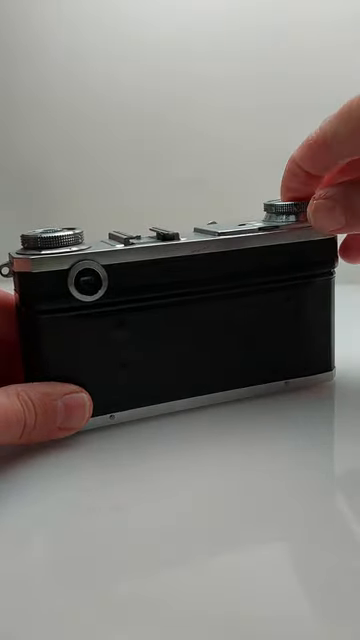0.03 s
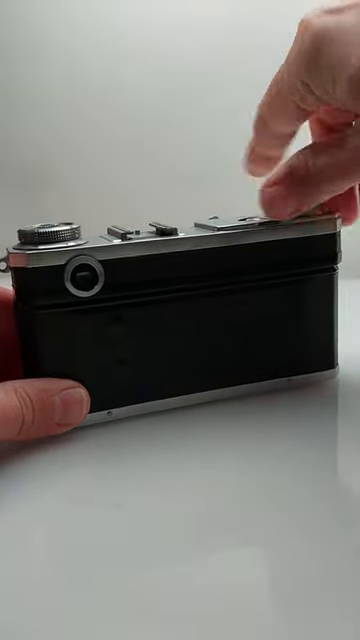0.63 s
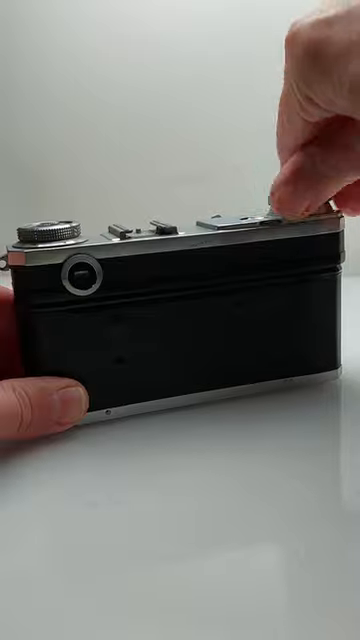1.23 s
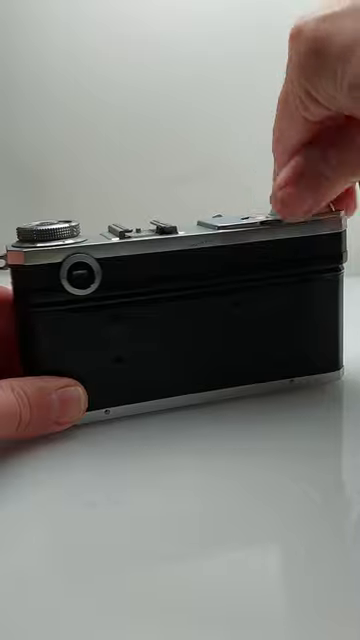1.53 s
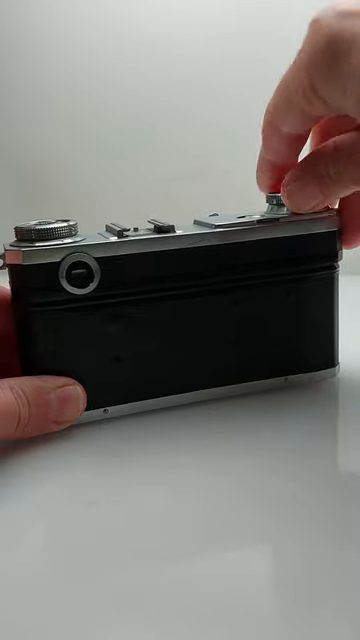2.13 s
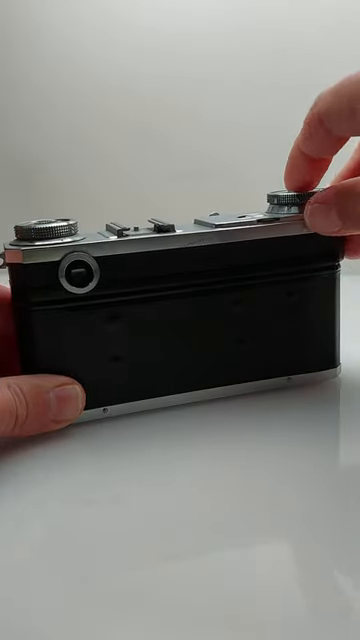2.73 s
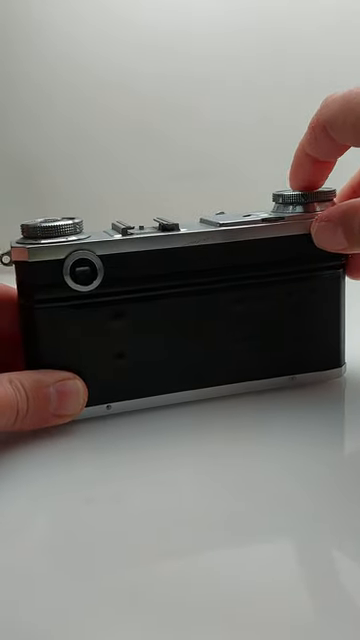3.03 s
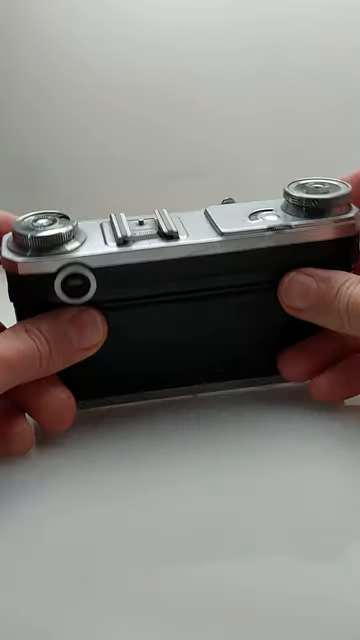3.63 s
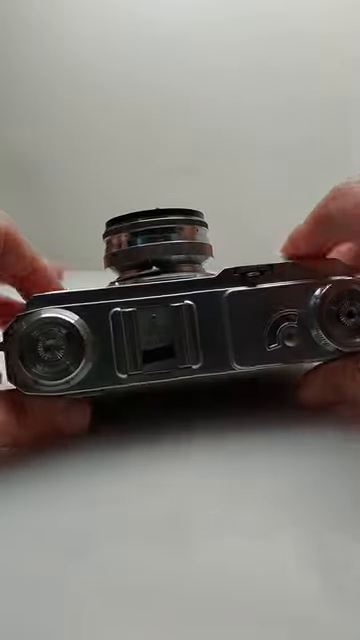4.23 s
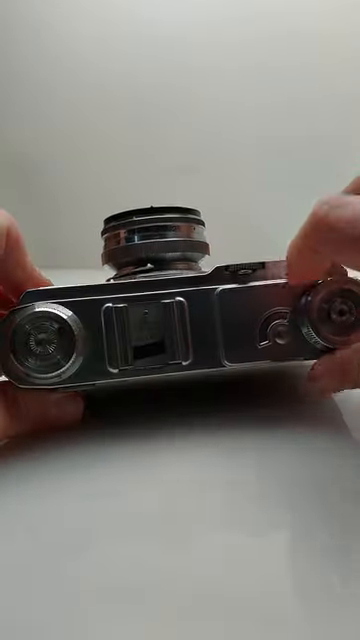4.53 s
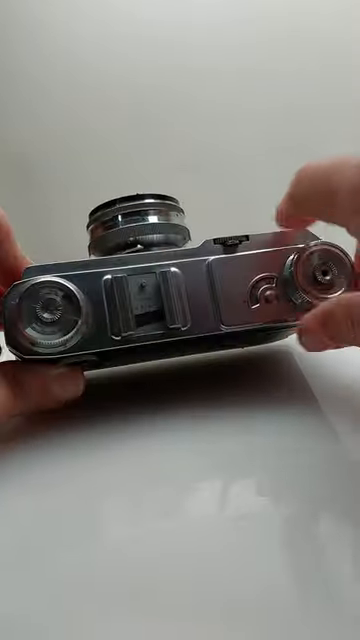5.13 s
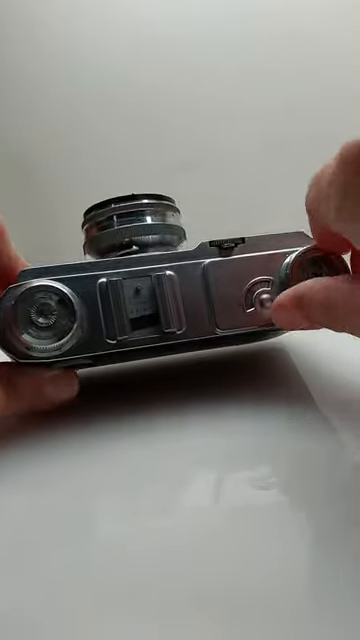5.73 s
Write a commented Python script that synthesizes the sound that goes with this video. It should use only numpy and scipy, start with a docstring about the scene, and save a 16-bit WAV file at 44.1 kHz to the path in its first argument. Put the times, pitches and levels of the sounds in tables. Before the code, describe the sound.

Close to the microphone in a small, quiet room, a mechanical camera on a table gives one crisp shutter snap with a low thud. Lighter metallic clicks and tiny pings follow as a dial is set by hand. A second snap comes about three seconds in, then a few dull bumps as the camera tips over. Faint finger rubbing, very faint wavering whistles and some clicks from the winding knob finish it.

```python
"""An old metal rangefinder camera is handled on a table in a small room, close to a phone.
The cloth shutter fires: its curtains whirr across and slam into their brakes, thumping case and table.
The speed dial is lifted, turned and dropped, with clicks, scrapes and a thin ping from its spring.
The shutter fires again, then the camera is tipped over, bumping and dragging on the table.
Last, fingers rub over leather and chrome and work the winding knob, with thin, wavering whistles."""
import sys
import numpy as np
from scipy import signal
from scipy.fft import rfft, irfft
from scipy.io import wavfile
from scipy.ndimage import uniform_filter1d

SR = 44100
rng = np.random.default_rng(int(sys.argv[2]) if len(sys.argv) > 2 else 0)


def bounce(signal):
    """Save signal as a 16-bit WAV file at the path given by the first command-line argument."""
    frames = np.transpose(np.atleast_2d(signal))
    limited = np.clip(frames, -1, 1)
    pcm = np.round(limited * 32767).astype(np.int16)
    wavfile.write(sys.argv[1], SR, pcm)


N = 264159
TIME = np.arange(N) / SR
RING_T = np.arange(int(.35 * SR)) / SR

# the shutter fires: start_s, gain_db
SHOTS = [(0.0141, 0.5), (3.2021, 0)]
# each firing trips the release, then brakes the two curtains in turn: delay_s, level_db, hardness_db
SHUTTER_STOPS = [(-.0302, -47, 10), (0, -26.5, 3), (.0089, -26.5, 0)]
# dial and knob drop into their stops: start_s, level_db, hardness_db, thump_db
DIAL_STOPS = [(0.169, -54, -5.5, -48), (0.2129, -57, -8.5, -56), (0.3047, -47.5, -1, -47.5),
              (0.5694, -54, 3, -54), (0.9128, -36.5, 2, -34.5), (0.974, -63.5, -12.5, -46.5),
              (1.0359, -50.5, -2.5, -41), (1.3346, -50.5, -1, -50), (1.4035, -48, -2.5, -54),
              (1.4209, -44, -1.5, -35), (1.5956, -40.5, 2, -57), (1.6057, -35.5, -0.5, -31),
              (1.633, -43, 0, -48), (1.7317, -49.5, -1.5, -41.5), (1.852, -42.5, 3, -50),
              (1.9653, -56, -2.5, -52), (1.992, -44.5, -0.5, -41.5), (2.012, -60, -6, -47.5),
              (3.347, -55.5, -2, -51), (3.879, -67.5, -6.5, -56), (4.3531, -69.5, 3.5, -63),
              (4.5775, -68, 1.5, -67), (5.1, -68, -1.5, -68), (5.1378, -57, -4.5, -57),
              (5.2328, -59, -9, -49.5), (5.5326, -68.5, -10.5, -55.5), (5.716, -35.5, -2.5, -47.5),
              (5.748, -52.5, 5, -49.5), (5.8634, -63.5, -4, -62.5), (5.921, -50.5, 0, -52.5)]
# the body bumps on the table as it tips over: start_s, level_db, thump_db, thump_hz
BUMPS = [(3.7663, -58.5, -30, 138.7), (3.7778, -48.5, -27.5, 150.6), (3.959, -38, -29.5, 96),
         (4.0224, -50.5, -31.5, 144), (4.227, -60.5, -39, 146)]
# midrange colour of the small metal parts: frequency_hz, gain_db
METAL_COLOUR = [(600, -24), (1300, 4.5), (1850, 4), (2500, 2), (3500, -5), (4800, 1), (6800, -15),
                (9000, -28)]
# their treble colour: frequency_hz, gain_db
TREBLE_COLOUR = [(4000, -51), (5800, -1.5), (6800, -0.5), (8200, -1), (10000, 4.5), (11800, 1.5),
                 (13500, -0.5), (16000, -7)]


def undb(db):
    return 10 ** (np.asarray(db) / 20)


def level(x, db, span_s=None):
    """Scale x so that its first span_s seconds (or all of it) have this rms level."""
    head = x if span_s is None else x[..., :int(span_s * SR)]
    return x * undb(db) / np.sqrt(np.mean(head ** 2) + 1e-20)


def add(track, s, x):
    """Mix x into the track from time s on."""
    i = int(s * SR)
    x, i = x[..., max(-i, 0):], max(i, 0)
    track[..., i:i + x.shape[-1]] += x[..., :max(N - i, 0)]


def fade(t60):
    return np.exp(-np.log(1000) * RING_T / t60)


def mode(hz, t60):
    return np.sin(2 * np.pi * hz * RING_T) * fade(t60)


def through(x, response):
    return signal.oaconvolve(x, response)[:len(x)]


def colour(points, size=2048):
    """Causal impulse response with the given (Hz, dB) spectrum."""
    hz, db = np.transpose(points)
    bin_hz = np.arange(size // 2 + 1) * SR / size
    gain = undb(np.interp(np.log(bin_hz + 1), np.log(hz), db))
    cepstrum = irfft(np.log(gain))
    cepstrum[1:size // 2] *= 2
    cepstrum[size // 2 + 1:] = 0
    return irfft(np.exp(rfft(cepstrum)))[:size]


def varied_colour(points, spread_db=4.5):
    """Each contact excites the metal a little differently."""
    return colour(np.array(points) + np.outer(rng.standard_normal(len(points)), [0, spread_db]))


def wander(rate_hz):
    """A smooth random drift around zero."""
    hold = max(int(SR / rate_hz), 1)
    steps = np.repeat(rng.standard_normal(N // hold + 1), hold)
    return 1.8 * uniform_filter1d(steps, hold)[:N]


def grit(n, spread_db, size=12):
    """Dense tiny contacts of uneven strength, capped so that none stands out."""
    strength = undb(spread_db * np.minimum(rng.exponential(1, n // size + 1), 4))
    return rng.standard_normal(n) * np.repeat(strength, size)[:n]


def contact(db, hardness_db):
    """Hardness trades case ring for metal and treble; returns case_db, metal_db, treble_db."""
    return db - hardness_db + 2, db + .15 * hardness_db, db + hardness_db - 2.5


def case_ring(centre_hz, focus_db=15, decay_scale=.46):
    """Each part strikes the case elsewhere and favours the modes around its own centre."""
    # modes of the camera case: pitch_hz, level_db, t60_s (before decay_scale)
    case_modes = [(525, -2, 0.11), (576, -5.5, 0.12), (640, -2, 0.02), (718, -7.5, 0.18),
                  (799, -2.5, 0.087), (802, -8.5, 0.033), (954, -5, 0.054), (1096, -2, 0.077),
                  (1204, -4, 0.097), (1373, 1, .07)]
    signs = rng.choice([-1, 1], len(case_modes))
    return sum(sign * undb(db - focus_db * abs(np.log2(hz / centre_hz))) * mode(hz, t60 * decay_scale)
               for sign, (hz, db, t60) in zip(signs, case_modes))


def scrape_cues(curtain_lead_s=.022, curtain_swell_db=11, run_up_s=.02, run_up_swell_db=7.5):
    """Parts speed up into their stops, long turns stay even: start_s, end_s, contact levels, swell_db."""
    # longer turns of dial and knob: start_s, end_s, level_db, hardness_db
    long_turns = [(0.518, 0.567, -68, 0), (1.235, 1.338, -64.5, -0.5), (1.61, 1.639, -52.5, -1.5),
                  (1.962, 2.027, -56.5, -3.5), (2.189, 2.3, -78.5, -2), (3.774, 3.851, -64.5, -3),
                  (4.719, 5.16, -79.5, -7), (5.528, 5.564, -66.5, -4)]
    last_brake_s = SHUTTER_STOPS[-1][0]
    curtains = [(s - curtain_lead_s, s + last_brake_s, contact(db - 38.5, -3.5), curtain_swell_db)
                for s, db in SHOTS]
    run_ups = [(s - run_up_s, s, contact(db - 20, hard), run_up_swell_db)
               for s, db, hard, _ in DIAL_STOPS]
    turns = [(start, end, contact(db, hard), 0) for start, end, db, hard in long_turns]
    return curtains + run_ups + turns


def scrapes(case_hz=900, trim_db=1.5, catch_db=3):
    """Curtain gears and dial teeth catch and slip as they slide; returns case, metal and treble."""
    out = np.zeros((3, N))
    metal, treble = colour(METAL_COLOUR), colour(TREBLE_COLOUR)
    for start, end, levels, swell_db in scrape_cues():
        n = max(int((end - start) * SR), 100)
        force_db = swell_db * np.arange(n) / n + catch_db * wander(300)[:n]
        force = undb(force_db) * signal.windows.tukey(n, .3)
        friction = np.pad(grit(n, spread_db=.5, size=24) * force, (0, len(RING_T)))
        case = case_ring(case_hz, focus_db=16.5, decay_scale=.26)
        for track, response, db in zip(out, (case, metal, treble), levels):
            add(track, start, level(through(friction, response), db + trim_db, n / SR))
    return out


def click_cues(brake_hz=724, bump_hz=584, dial_hz=935, octaves_per_db=.05):
    """Shutter stops, soft bumps and small clicks: start_s, contact levels, ring_hz."""
    # ticks of a nail or a loose part, too light to move the camera: start_s, level_db
    ticks = [(0.5273, -68.5), (0.679, -61.5), (0.767, -68), (0.854, -58), (1.0224, -62), (1.229, -62),
             (1.749, -58.5), (1.7875, -60), (2.145, -66.5), (2.523, -68), (3.659, -56), (3.749, -64.5),
             (4.96, -70), (5.355, -64), (5.4157, -70.5)]
    shutter = [(s + delay, contact(db + shot_db, hard), brake_hz)
               for s, shot_db in SHOTS for delay, db, hard in SHUTTER_STOPS]
    bumps = [(s, contact(db, hardness_db=-11.5), bump_hz) for s, db, _, _ in BUMPS]
    # among the small clicks, harder ones ring higher; ticks are hardest
    hits = [row[:3] for row in DIAL_STOPS] + [(s, db, 9.5) for s, db in ticks]
    small = [(s, contact(db, hard), dial_hz * 2 ** (octaves_per_db * hard)) for s, db, hard in hits]
    return shutter + bumps + small


def clicks(thud_t60=.0097, chatter_t60=.025, seat_s=.0009, span_s=.007):
    """A part meets its stop and chatters for a few milliseconds; returns case, metal and treble."""
    out = np.zeros((3, N))
    seating = 1 - np.exp(-RING_T / seat_s)
    for s, (case_db, metal_db, treble_db), hz in click_cues():
        chatter = grit(len(RING_T), spread_db=2.5) * seating * fade(chatter_t60)
        # the gripping hand kills most of the case's first swing at once
        ring = level(case_ring(hz), 0, span_s) + level(mode(hz, thud_t60), 0, span_s)
        add(out[0], s, level(ring * seating, case_db - 1, span_s))
        add(out[1], s, level(through(chatter, varied_colour(METAL_COLOUR)), metal_db, span_s))
        add(out[2], s, level(through(chatter, varied_colour(TREBLE_COLOUR)), treble_db, span_s))
    return out


def thump_cues(flex_hz=332.5, dial_hz=145.8, nudge_hz=95, tipped_s=4.5, tipped_ratio=1.54):
    """Blows into the table, soft fingers low and hard stops high: start_s, level_db, pitch_hz."""
    # release and brakes each jolt the table: delay_s, level_db, pitch_hz
    jolts = [(-.024, -30, 150), (.0005, -24, 165), (0.011, -17, 175.6)]
    # fingertips press or let go and rock the camera: start_s, level_db
    nudges = [(0.258, -49), (0.433, -51.5), (0.689, -53), (0.791, -44), (1.113, -48), (2.199, -51.5),
              (3.071, -46.5), (3.542, -50), (3.66, -42.5), (4.389, -49.5), (5.197, -53), (5.634, -49)]
    cues = [(s + delay, db + shot_db, hz) for s, shot_db in SHOTS for delay, db, hz in jolts]
    # the second brake and each bump also flex the body: a hollow note
    cues += [(s + jolts[-1][0], shot_db - 29, flex_hz) for s, shot_db in SHOTS]
    cues += [(s, thump_db, hz) for s, _, thump_db, hz in BUMPS]
    cues += [(s + .0071, db + 8.5, flex_hz) for s, db, _, _ in BUMPS]
    cues += [(s, thump_db, dial_hz) for s, _, _, thump_db in DIAL_STOPS]
    cues += [(s, db, nudge_hz) for s, db in nudges]
    # on its front edge the camera sits more stiffly and swings higher
    return [(s, db, hz * (tipped_ratio if s > tipped_s else 1)) for s, db, hz in cues]


def table_thumps(swing_t60=.051, ring_db=-3, focus_db=9, scatter_db=4.5, decay_scale=.82, span_s=.02):
    """The held camera swings briefly on the table, whose modes near that pitch ring on in stereo."""
    # modes of the loaded table: pitch_hz, level_db, t60_s (before decay_scale), left_minus_right_db
    table_modes = [(67, 5, 0.32, -11), (113, -0.5, 0.15, 10), (134.86, 1.5, 0.26, 9),
                   (174.5, -2.5, 0.24, -2), (198.5, -5.5, 0.26, 5.5), (279.3, -5, 0.19, -8.5),
                   (328.5, 5, 0.14, -2.5), (349.3, -3, 0.059, -2.5)]
    out = np.zeros((2, N))
    hz, mode_db, t60, pan_db = np.transpose(table_modes)
    rings = np.array([mode(f, t * decay_scale) for f, t in zip(hz, t60)])
    sides = undb(np.outer([1, -1], pan_db) / 2)
    for s, db, swing_hz in thump_cues():
        rise = 1 - np.exp(-(RING_T * swing_hz) ** 2)  # the contact builds over one cycle
        scatter = scatter_db * rng.standard_normal(len(hz))
        weights = undb(mode_db - focus_db * abs(np.log2(hz / swing_hz)) + scatter)
        swing = level(mode(swing_hz, swing_t60) * rise, 0, span_s)
        ring = level((sides * weights) @ rings * rise, ring_db, span_s)
        add(out, s, level(swing + ring, db - 1, span_s))
    return out


def dial_spring():
    """The dial's spring rings on, thin and high, after some clicks."""
    # the spring is set ringing: start_s, level_db
    pings = [(.765, -57), (1.747, -47), (1.788, -55), (1.852, -42)]
    # its modes: pitch_hz, level_db, t60_s
    spring_modes = [(6700, -17, .1), (10400, -15, .1), (11450, -6, 0.11), (11700, -3, 0.081),
                    (13210, -16, .1)]
    out = np.zeros(N)
    ring = sum(undb(db) * mode(hz, t60) for hz, db, t60 in spring_modes)
    for s, db in pings:
        add(out, s, undb(db) * ring)
    return out


def finger_rubs(trim_db=1):
    """Skin drags unevenly over the camera; returns a dull rub on leather and a hiss on chrome."""
    # fingers shift their grip: start_s, end_s, leather_db, chrome_db
    strokes = [(2.172, 2.35, -74, -79), (2.423, 2.568, -80, -94), (3.461, 3.525, -76, -66.5),
               (3.613, 3.812, -71.5, -72), (4.082, 4.261, -68.5, -69.5), (4.26, 4.684, -78, -74.5),
               (4.669, 5.19, -72, -72), (5.314, 5.737, -68.5, -78.5)]
    # colour of rubbed leather: frequency_hz, gain_db
    leather = [(200, -5), (500, -7.5), (820, -0.5), (1250, -6.5), (1800, -7), (2300, -13), (3200, -29),
               (7000, -23.5), (16000, -53)]
    # colour of rubbed chrome: frequency_hz, gain_db
    chrome = [(1000, 4), (3000, -12), (4500, -4.5), (6500, -5), (8200, -9), (10500, 1), (13000, -10.5),
              (16000, -3)]
    speed = np.zeros((2, N))
    for start, end, *levels in strokes:
        flat_arch = np.hanning(max(int((end - start) * SR), 8)) ** .067
        add(speed, start, np.outer(undb(levels), flat_arch))
    rub_gain, hiss_gain = speed * undb(2 * wander(35))
    rub = level(through(grit(N, spread_db=3.5), colour(leather)), trim_db)
    hiss = level(through(grit(N, spread_db=-4), colour(chrome)), trim_db)
    return rub_gain * rub, hiss_gain * hiss


def drag_and_whistles(flutter_db=1):
    """The camera drags on the table, a faint, rough scrape near 2.2 kHz; then thin, wavering whistles."""
    # narrow tones, rougher with more jitter: start_s, end_s, start_hz, end_hz, jitter_hz, level_db
    tones = [(4.04, 4.45, 2200, 2150, 230, -77), (5.17, 5.62, 4480, 4430, 50, -81),
             (5.55, 5.7, 4550, 4100, 50, -79)]
    out = np.zeros(N)
    for start, end, start_hz, end_hz, jitter_hz, db in tones:
        n = max(int((end - start) * SR), 100)
        hz = np.linspace(start_hz, end_hz, n) + jitter_hz * wander(630)[:n]
        envelope = signal.windows.tukey(n, .3) * undb(flutter_db * wander(42)[:n])
        add(out, start, level(envelope * np.sin(2 * np.pi * np.cumsum(hz) / SR), db))
    return out


def mic_ports(x, pan_db, lag_s):
    """The phone's left port hears x as it is; the right one lag_s later and pan_db lower."""
    return np.array([x, undb(-pan_db) * np.interp(TIME - lag_s, TIME, x)])


def wall_echo(low_t60=.27, high_t60=.22, first_s=.001, build_s=.001, size=256):
    """Diffuse reflections of near walls: an even spectrum whose treble fades a little sooner."""
    # colour of the room's echo: frequency_hz, gain_db
    room_colour = [(80, -24), (300, -16), (600, -7), (1500, -6), (4500, -7.5), (8000, -6), (16000, -6)]
    f, t, spectra = signal.stft(rng.standard_normal(len(RING_T)), SR, nperseg=size)
    hz, db = np.transpose(room_colour)
    db = np.interp(np.log(f + 1), np.log(hz), db)[:, None]
    decay = np.log(1000) / np.interp(f, [500, 4000], [low_t60, high_t60])[:, None]
    gain = undb(db) * np.exp(-decay * t) * np.sqrt(2 * decay / SR)  # same energy whatever the decay
    even = spectra / (abs(spectra) + 1e-12) * np.std(spectra)
    tail = signal.istft(even * gain, SR, nperseg=size)[1][:len(RING_T)]
    return tail * (1 - np.exp(-np.maximum(RING_T - first_s, 0) / build_s))


def room(x, count=6):
    """Each port hears its own reflections, and they shift as hands and camera move."""
    place = np.linspace(0, count - 1, N)
    crossfades = [np.sqrt(np.maximum(1 - abs(place - k), 0)) for k in range(count)]
    return np.array([sum(through(x * share, wall_echo()) for share in crossfades) for _ in range(2)])


def room_tone(shared_hz=300, level_db=-68.5):
    """Faint rumble common to both ports, under their own hiss."""
    # spectrum of the still room: frequency_hz, density_db
    still_air = [(15, -50), (25, -7.5), (58, -1), (145, 1.5), (242, -5), (293, -5), (384, -14.5),
                 (439, -15.5), (489, -25), (641, -19), (5730, -33.5), (9570, -33), (16000, -33)]
    shared, left, right = rng.standard_normal((3, N))
    low, high = (signal.butter(1, shared_hz, kind, fs=SR, output="sos") for kind in ("low", "high"))
    noise = signal.sosfilt(low, shared) + signal.sosfilt(high, [left, right])
    response = colour(still_air, size=8192)
    return level(np.array([through(side, response) for side in noise]), level_db)


def scene():
    """Case, metal and treble reach the ports directly and through the room; the table booms beneath."""
    case, metal, treble = clicks() + scrapes()
    rub, hiss = finger_rubs()
    case += rub
    metal += drag_and_whistles()
    treble += dial_spring() + hiss
    table = table_thumps()
    # the camera lies to the left: the higher the sound, the more the phone shades its right port
    direct = (mic_ports(case, pan_db=-1, lag_s=.00025)
              + mic_ports(metal, pan_db=10, lag_s=.0003)
              + mic_ports(treble, pan_db=17, lag_s=.00033))
    body_echo = room(case + metal + table.mean(axis=0)) * undb([[-2], [-.4]])  # left, right
    treble_echo = room(treble) * undb([[-3], [-9]])
    return direct + table + body_echo + treble_echo + room_tone()


def record(dry, bass_hz=44, top_hz=16100):
    """The phone thins the deep bass and cuts the top."""
    thinned = signal.sosfilt(signal.butter(4, bass_hz, "high", fs=SR, output="sos"), dry)
    return signal.sosfilt(signal.ellip(10, .2, 70, top_hz, fs=SR, output="sos"), thinned)


dry = scene()
out = record(dry)
bounce(out)
```